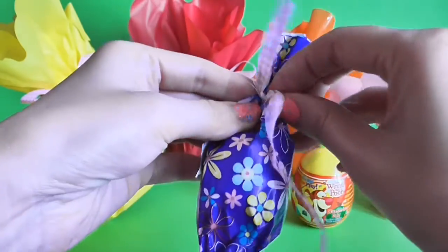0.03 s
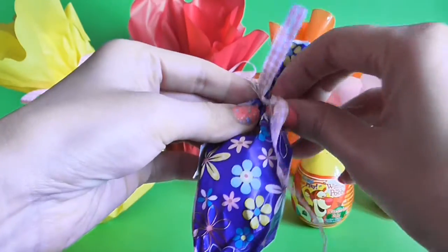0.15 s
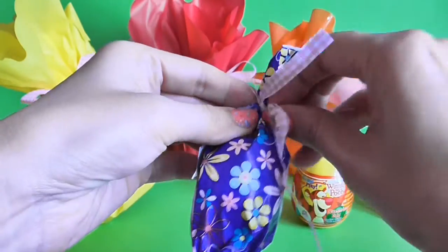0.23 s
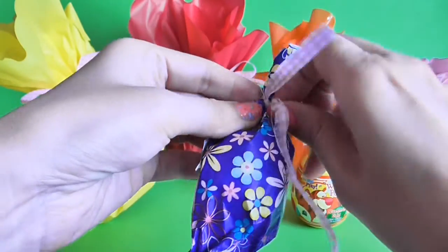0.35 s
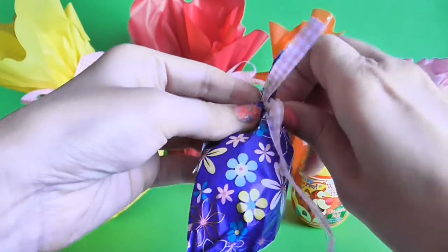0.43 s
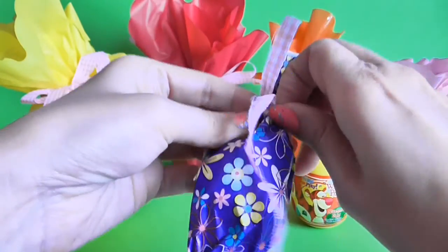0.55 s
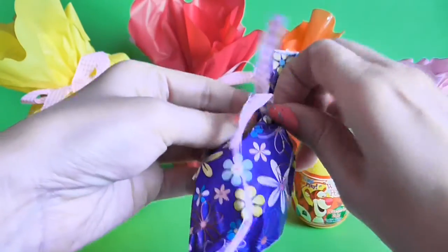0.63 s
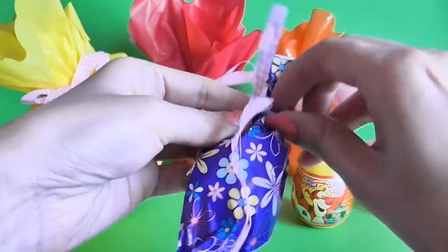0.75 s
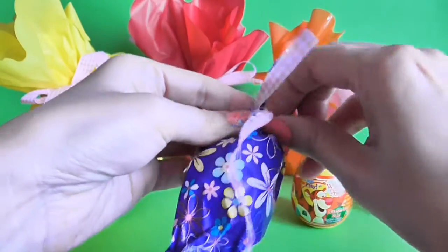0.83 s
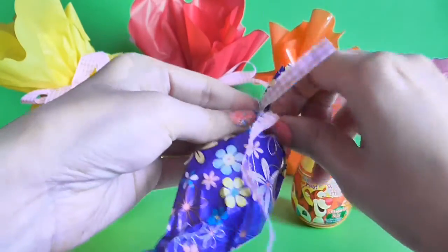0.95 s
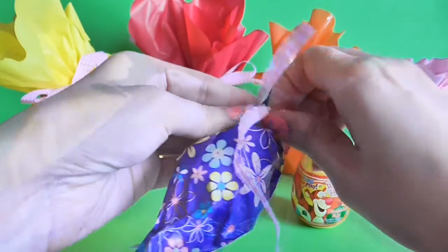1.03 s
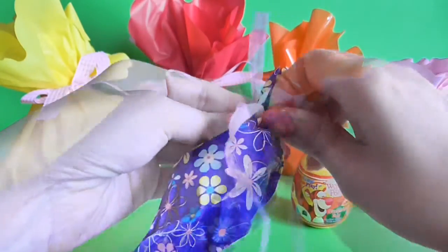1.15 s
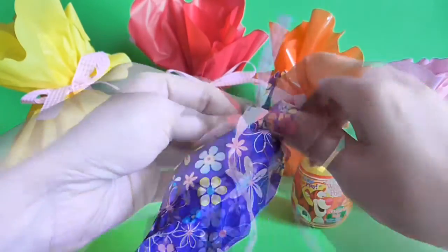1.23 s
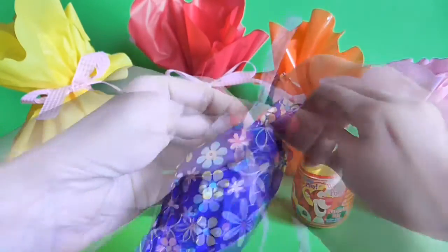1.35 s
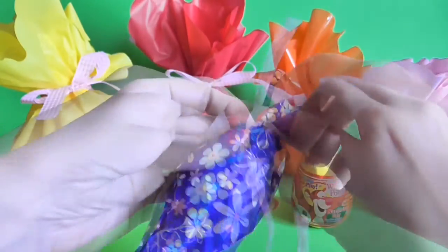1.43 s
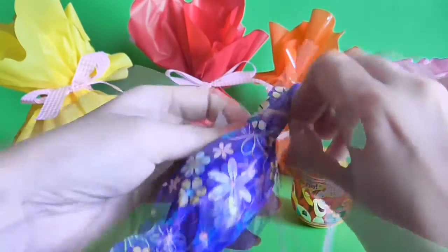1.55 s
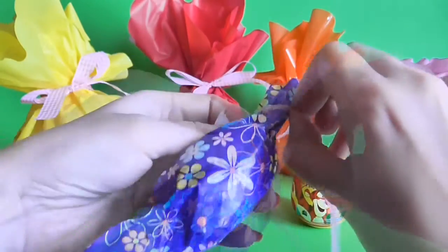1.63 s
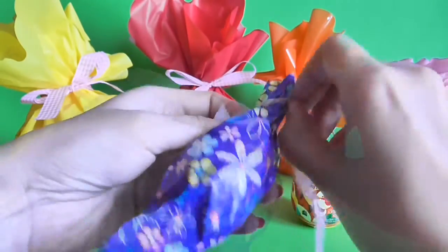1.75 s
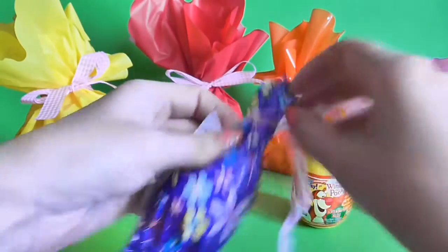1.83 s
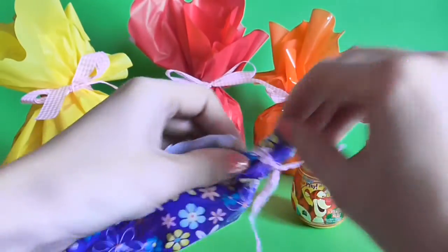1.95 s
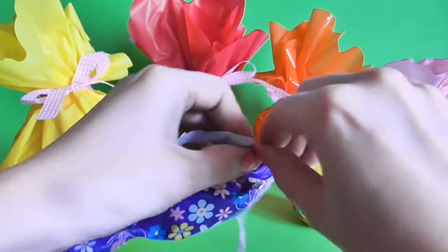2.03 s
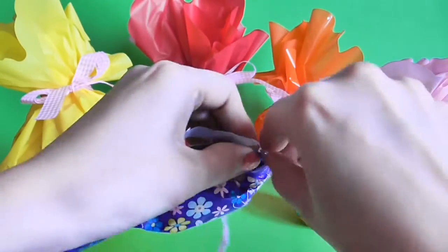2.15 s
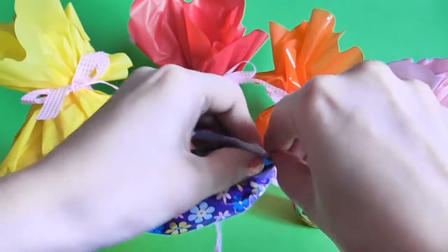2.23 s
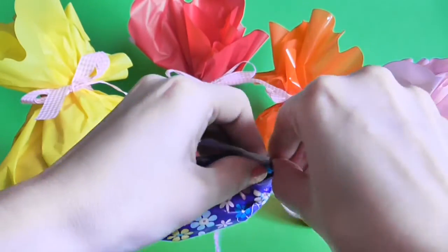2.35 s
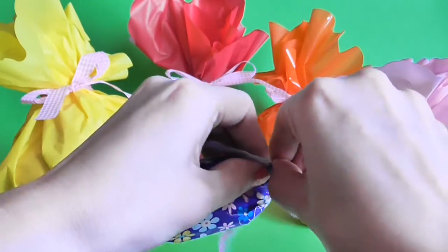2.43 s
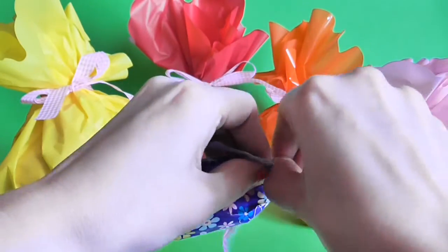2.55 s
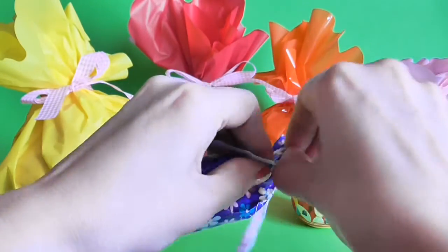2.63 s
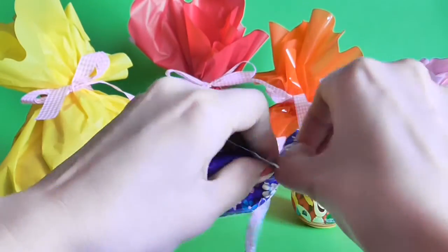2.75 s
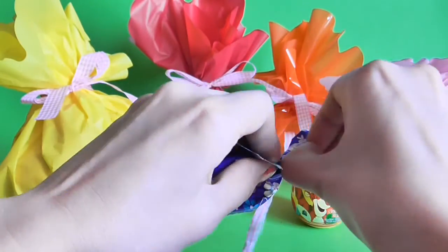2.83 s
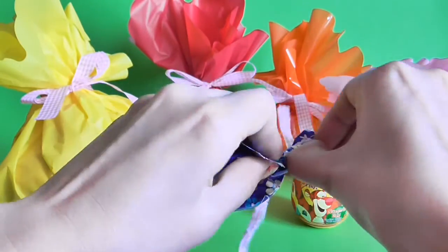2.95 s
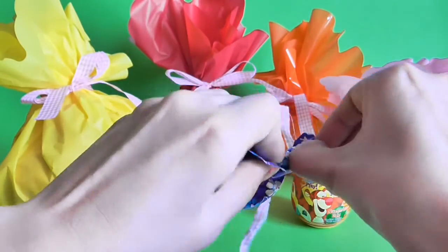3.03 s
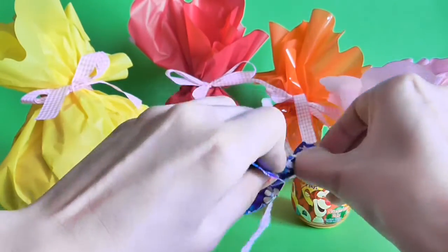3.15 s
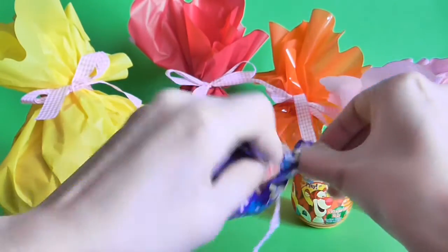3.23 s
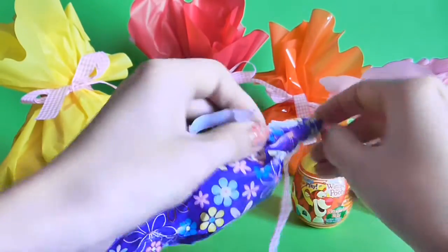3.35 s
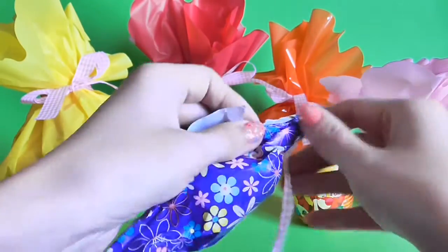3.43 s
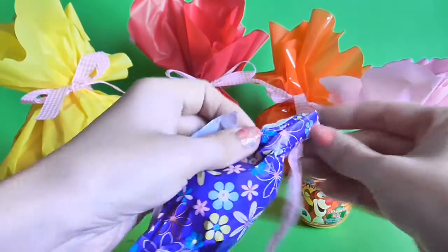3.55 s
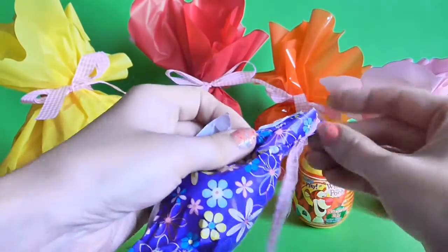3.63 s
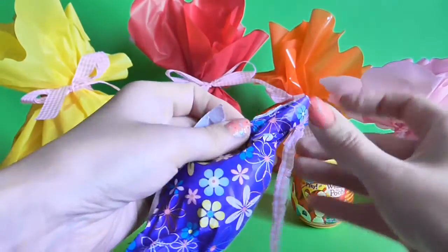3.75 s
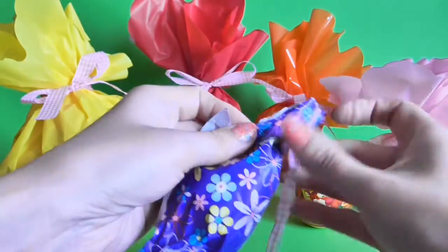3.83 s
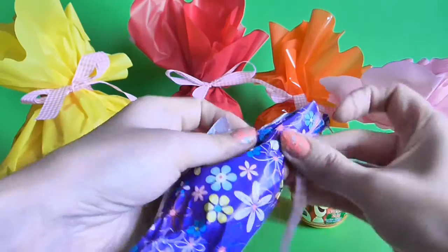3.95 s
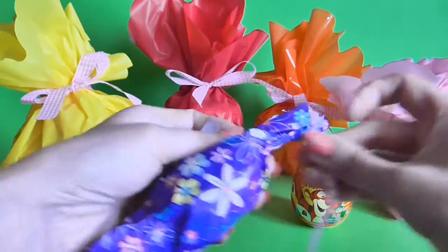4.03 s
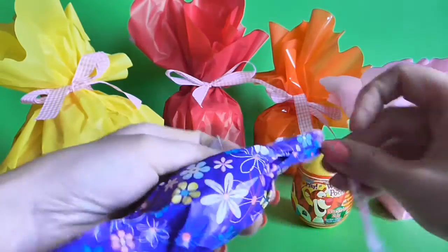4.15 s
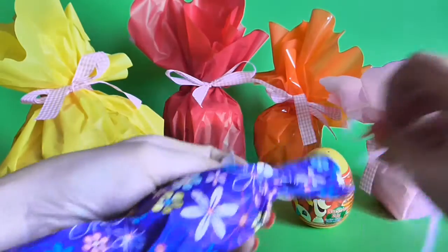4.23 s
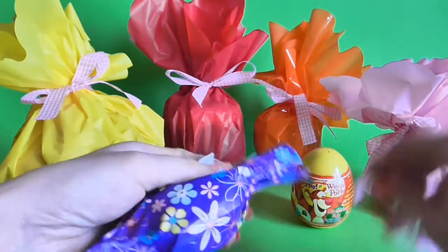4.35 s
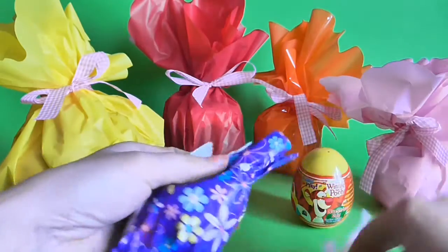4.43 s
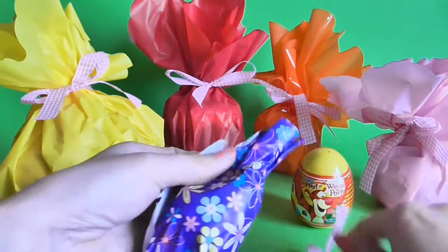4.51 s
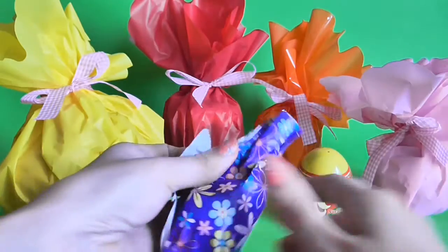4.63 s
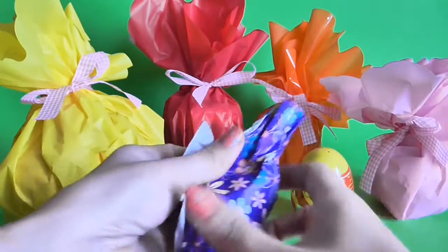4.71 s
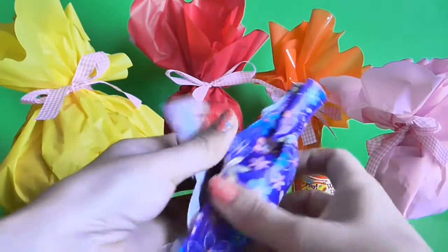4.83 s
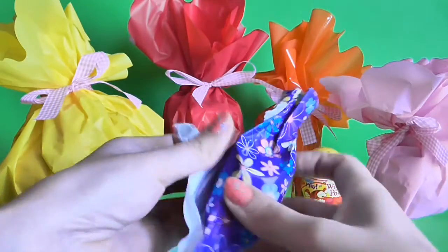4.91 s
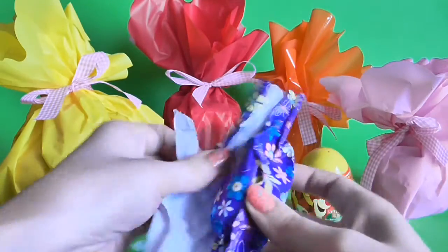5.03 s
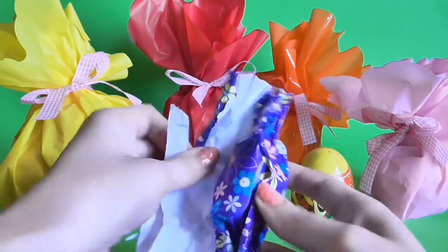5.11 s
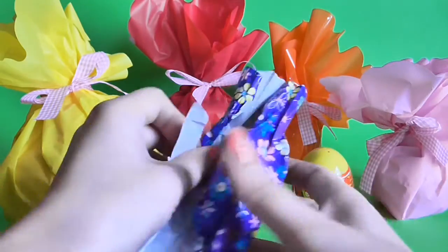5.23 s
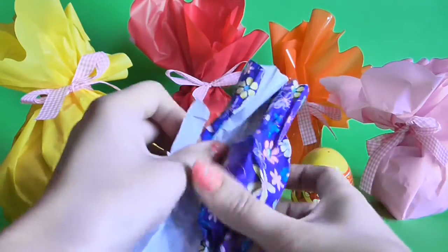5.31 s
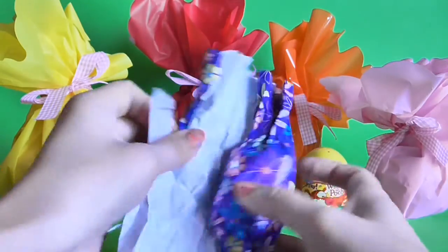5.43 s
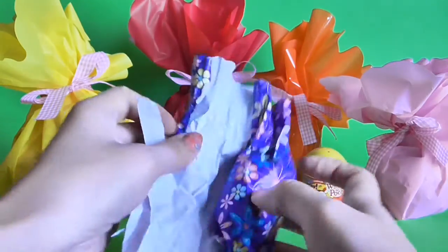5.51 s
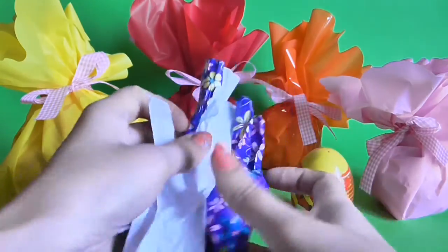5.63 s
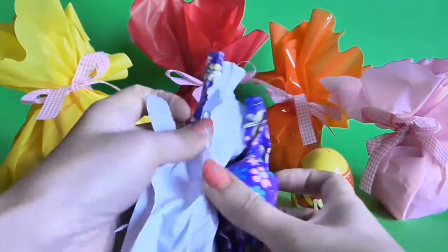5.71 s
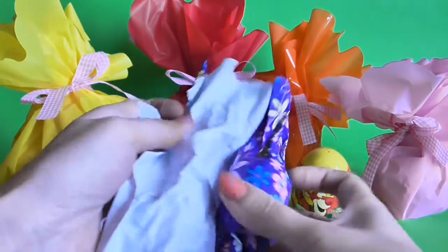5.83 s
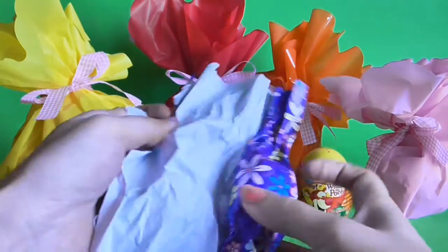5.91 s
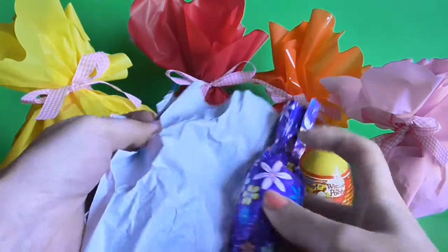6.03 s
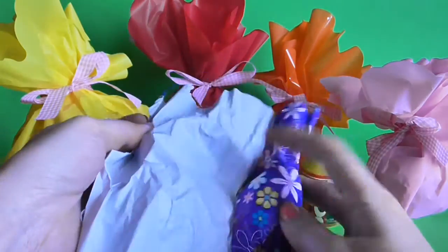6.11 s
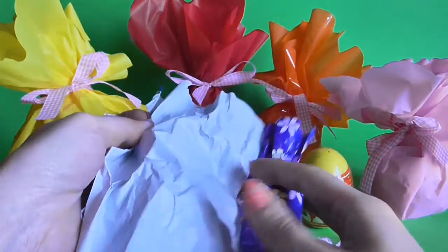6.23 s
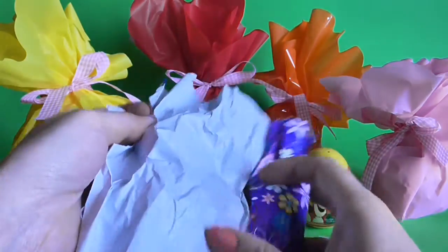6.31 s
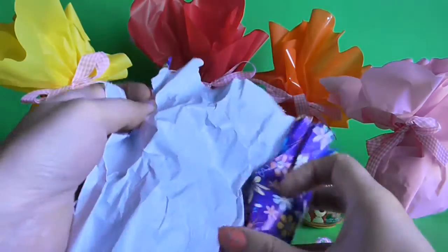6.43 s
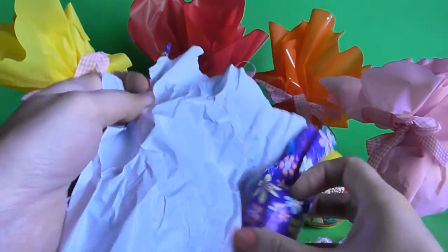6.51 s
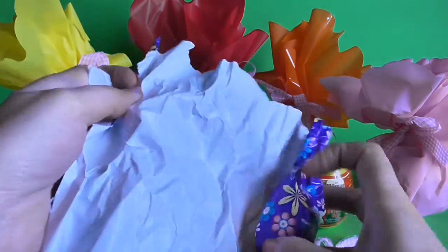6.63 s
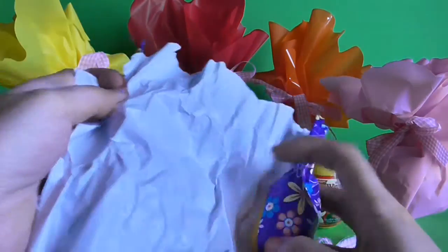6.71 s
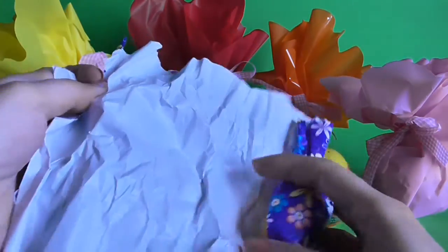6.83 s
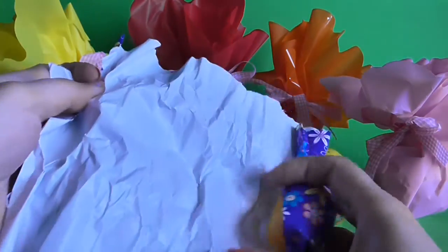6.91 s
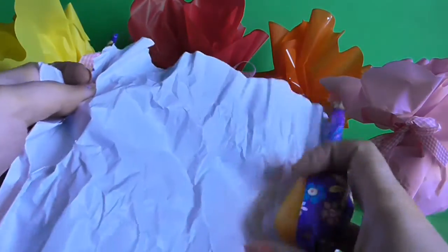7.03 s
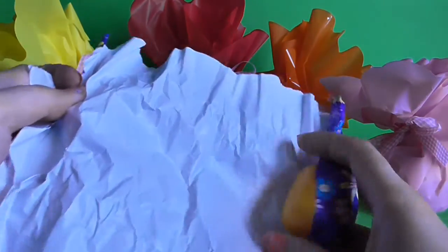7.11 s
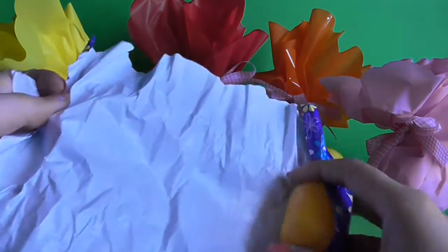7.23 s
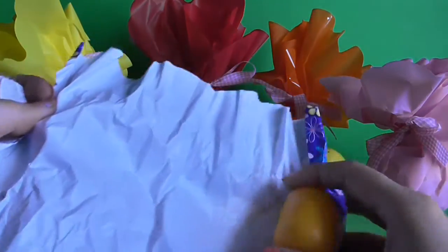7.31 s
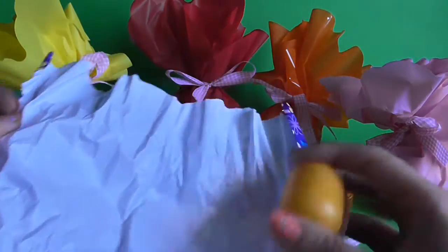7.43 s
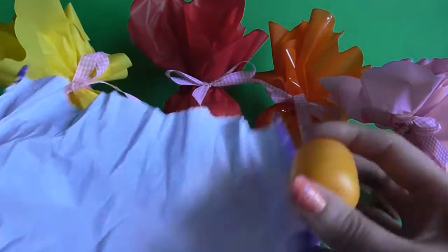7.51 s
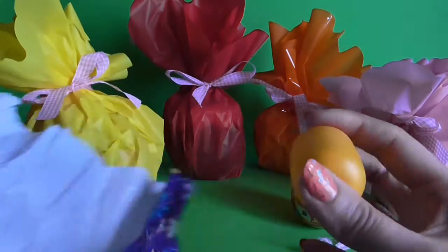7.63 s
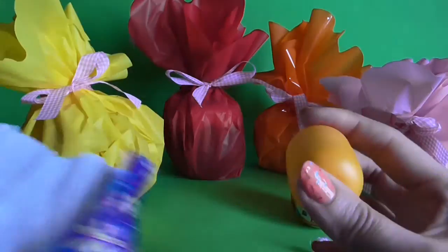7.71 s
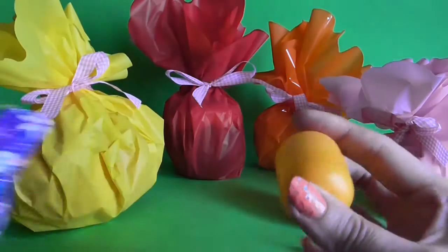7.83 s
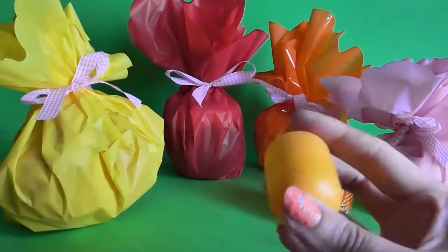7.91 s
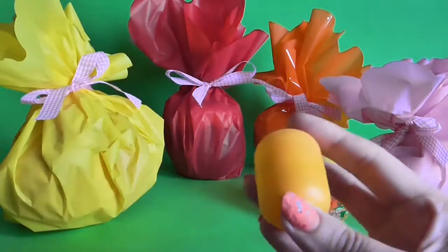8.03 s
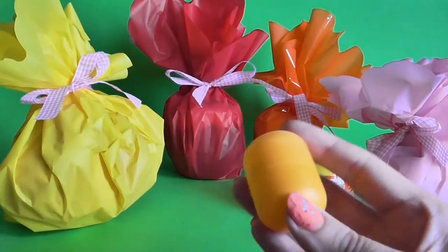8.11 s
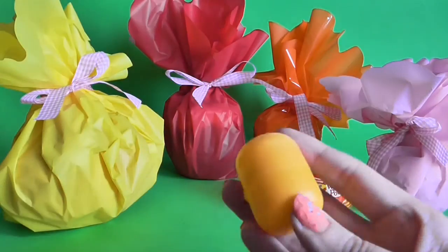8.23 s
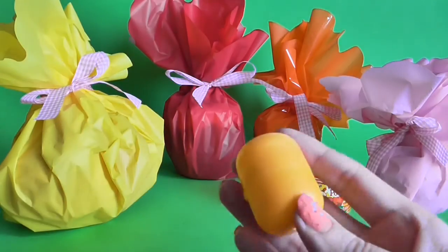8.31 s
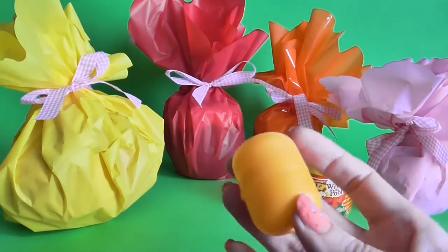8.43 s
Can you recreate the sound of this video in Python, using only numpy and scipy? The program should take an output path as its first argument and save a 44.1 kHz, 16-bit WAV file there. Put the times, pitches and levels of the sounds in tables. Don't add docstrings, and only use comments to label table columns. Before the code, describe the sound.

Hands work at a ribbon on stiff paper very close to a stereo microphone in a soft, quiet room. Sparse sharp ticks and short crinkles come first, then a thin, high ribbon rub. After a strong snap the paper opens in dense crackling and broad rustling, with dull puffs as the sheet flaps, then thins to a few faint rustles.

```python
import sys
import numpy as np
from scipy import signal
from scipy.fft import rfft, irfft, next_fast_len
from scipy.io import wavfile
from scipy.ndimage import uniform_filter1d

SR = 44100
rng = np.random.default_rng(int(sys.argv[2]) if len(sys.argv) > 2 else 0)


def gain_from_db(level_db):
    decades = np.asarray(level_db, float) / 20
    return 10 ** decades


def dump_mix(stems):
    frames = np.atleast_2d(stems).T
    limited = np.clip(frames, -1, 1)
    pcm = np.round(limited * 32767).astype(np.int16)
    wavfile.write(sys.argv[1], SR, pcm)


N = 373508


def rms_one(x):
    return x / np.sqrt(np.mean(x ** 2) + 1e-20)


def at_hz(points, hz):
    point_hz, point_db = np.transpose(points)
    return np.interp(np.log(hz), np.log(point_hz), point_db)


def drift(rate):
    r = np.exp(-16 * np.pi * rate / SR)
    noise = rng.standard_normal(N // 8 + 4002)
    slow = signal.lfilter([1], [1, -2 * r, r * r], noise)[4000:]
    return np.interp(np.arange(N) / 8, np.arange(len(slow)), rms_one(slow))


def band(x, low_hz, high_hz):
    edges = [low_hz, min(high_hz, SR / 2.1)]
    return signal.sosfilt(signal.butter(2, edges, "band", fs=SR, output="sos"), x)


def coloured(x, spectrum):
    hz = np.maximum(np.fft.rfftfreq(N, 1 / SR), 10)
    return irfft(rfft(x) * gain_from_db(at_hz(spectrum, hz)), N)


def capsules(x, lean):
    short_waves = band(band(x, 8740, 14300), 5600, 14600)
    side = lean * (short_waves * 0.91 + 0.26 * x)
    return np.array([x + side, x - side])


def low_swings(events, gain_db, swing_hz, t60_s, low_hz, high_hz):
    kicks = np.zeros(N)
    for s, db in events:
        kicks[round(s * SR)] = gain_from_db(db + gain_db)
    r = gain_from_db(-60 / (t60_s * SR))
    w = 2 * np.pi * swing_hz / SR
    swing = signal.lfilter([0, np.sin(w)], [1, -2 * r * np.cos(w), r * r], kicks + 1e-18)
    return band(swing, low_hz, high_hz)


# frequency in Hz, level in dB per Hz.
AIR = [(35, -15.5), (60, -14.5), (91, -8.5), (515, -5), (1660, -20), (14200, -31), (16000, -30)]


def hush(level_db=-64):
    mid, side = rms_one(coloured(rng.standard_normal((2, N)), AIR))
    return gain_from_db(level_db) * (mid + 1.9 * side * np.array([[1], [-1]]))


def room(x, t60_s=0.15, wall_cut_hz=15000):
    size = next_fast_len(N + SR // 2)
    w = 2 * np.pi * np.fft.rfftfreq(size)
    dull = 1 / (1 + 1j * w * SR / (2 * np.pi * wall_cut_hz))
    response = np.zeros((2, len(w)), complex)
    lags = (rng.uniform(0.0036, 0.014, 12) * SR).astype(int)
    for k, lag in enumerate(lags):
        loop = gain_from_db(-60 * lag / SR / t60_s) * dull * np.exp(-1j * w * lag)
        response[k % 2] += loop / (1 - loop) * (-1) ** (k // 2)
    return irfft(response * rfft(x, size), size)[:, :N]


# start in seconds, level in dB.
THUDS = [
    (0.111, -58),
    (0.4, -55),
    (0.869, -62),
    (1.819, -49),
    (1.889, -59),
    (1.949, -57),
    (4.149, -55),
    (5.819, -51),
    (6.199, -57),
    (7.591, -50),
]


def thuds():
    return low_swings(THUDS, gain_db=-0.5, swing_hz=84, t60_s=0.065, low_hz=42, high_hz=260)


# start in seconds, level in dB.
POPS = [(3.4551, -34), (4.297, -28.5), (4.9062, -27.5), (5.549, -26.5), (6.141, -36), (5.892, -24),
        (5.989, -22.5), (6.077, -25), (1.506, -38), (6.4601, -34), (6.636, -23.5), (6.671, -17),
        (7.0518, -32.5), (7.702, -32)]


def pushes():
    return low_swings(POPS, gain_db=-7.5, swing_hz=142, t60_s=0.024, low_hz=61, high_hz=900)


# time in seconds, flapping against folding in dB.
SLACK = [(0, -15.5), (1.4, -17.5), (1.85, -12.5), (2.3, -14), (2.7, -8), (3.0, -22.5), (3.7, -22.5),
         (4.5, -8.5), (5.2, -13), (5.9, -9.5), (6.6, -8), (7.4, -14), (8.47, -8)]


def slack(s):
    return np.interp(s, *np.transpose(SLACK))


# moment of most effort in seconds, rise over 20 dB in seconds, fall over 20 dB in
# seconds, crackle level in dB, folding level in dB.
MOVEMENTS = [(.13, 0.14, 0.08, -41, -46.5), (.43, 1.2, 0.26, -48, -51), (0.776, 0.03, 0, -32, -41),
             (0.889, 0.15, 0.11, -41, -47.5), (1.09, 2.5, 1, -52, -58), (1.253, -0.26, 0.02, -40, -40.5),
             (1.516, 0.03, -0.01, -27, -34), (1.73, 0.9, 0.4, -45.5, -51.5), (1.972, 0.06, 0, -32, -37),
             (2.129, 0.2, 0.24, -44, -48.5), (2.34, 0.06, -0.33, -42.5, -49), (2.45, .02, 0.9, -49.5, -53),
             (2.716, 0.01, 0.05, -29.5, -36.5), (2.872, 0.1, 0.23, -38.5, -42.5),
             (3.012, -0.5, 0.07, -38.5, -43.5), (3.146, 0.2, 0, -44.5, -50.5), (2.4, 2.5, .1, -54, -61.5),
             (2.56, -0.1, 0, -42, -52), (3.244, 0.26, 0.03, -41.5, -46), (3.457, 0.18, 0.47, -43.5, -46.5),
             (3.532, 0.16, 0.14, -48.5, -48), (3.666, 0.04, 0.08, -35.5, -42), (3.996, -0.16, 17, -52.5, -54.5),
             (4.138, 0.01, 0.1, -31.5, -38), (4.2, 0.02, 0.07, -34, -43), (4.302, 0.01, -0.13, -21, -32),
             (4.492, 0.17, 0.15, -42, -49),
             (4.587, 0.081, 0.095, -38.5, -43), (4.761, 0.1, 0.053, -41, -43.5),
          (4.91, 0.061, 0.43, -35.5, -49), (5.1, 0.15, 0.28, -32.5, -35.5), (5.279, 1, 0.072, -36, -38),
          (5.499, 0.057, 0.18, -33.5, -32.5), (5.712, 0.089, 0.071, -36.5, -36),
          (5.912, 0.19, 0.4, -29.5, -29), (6.08, 0.17, 0.033, -34, -33), (6.19, 0.091, 0.5, -40.5, -43.5),
          (6.398, 0.11, 0.73, -37.5, -39.5), (6.657, 0.1, 0.11, -28.5, -30),
          (6.85, 0.065, 0.58, -39.5, -43), (7.1, 0.3, 0.45, -35.5, -36.5), (7.26, 0.074, 0.083, -30, -32.5),
          (7.47, 1, 0.36, -47, -48.5), (7.58, 0.17, 0.13, -51, -41), (7.655, 0.059, 0.017, -25, -38),
          (7.732, 0.0083, .17, -44.5, -42.5), (7.88, 0.13, 0.083, -55, -47), (8.02, 0.3, 0.29, -55, -53),
          (8.159, .06, 0.13, -39.5, -36.5),
             (2.672, .01, .15, -43, -51),
    (7.605, .01, 0.12, -36.5, -37.5),
    (7.79, .03, 0.069, -44.5, -50),
    (8.24, .2, .2, -45.5, -47),
    (4.32, .02, 0.13, -39, -45.5),
    (5.421, .04, 0.04, -49, -37.5),
    (8.33, 0.12, 0.034, -40.5, -42),
    (8.46, 0.52, 0.088, -54.5, -51.5),
]


def effort(reach_s=0.56, flap_follows=0.94, mean_fold_db=-6):
    t = np.arange(0, N + 64, 64) / SR
    s, rise, fall, crackle_db, fold_db = np.transpose(MOVEMENTS)[:, :, None]
    away = 20 * np.maximum((s - t) / np.maximum(rise, .01), (t - s) / np.maximum(fall, .01))
    away = away + 20 * ((t - s) / reach_s) ** 4
    crackle = np.max(crackle_db - away, axis=0)
    fold = np.max(fold_db - away, axis=0)
    flap = mean_fold_db + flap_follows * (fold - mean_fold_db) + slack(t)
    return [np.interp(np.arange(N) / SR, t, db) for db in (flap, fold, crackle)]


# centre in Hz, width in Hz, level against the crackle in dB.
WEAVE = [
    (6120, 800, -9),
    (8170, 1100, -9),
]


def ribbon(from_s=2.21, to_s=3.35, fade_s=0.098):
    t = np.arange(N) / SR
    sliding = np.clip(np.minimum(t - from_s, to_s - t) / fade_s, 0, 1)
    song = np.zeros(N)
    for hz, width, db in WEAVE:
        threads = rms_one(band(rng.standard_normal(N), hz - width / 2, hz + width / 2))
        song += gain_from_db(db + 4.6 * drift(9.7)) * threads
    crackle_db = effort()[2]
    return capsules(song * sliding * gain_from_db(crackle_db), -.05)


# frequency in Hz, level in dB per Hz.
PAPER = [(35, -43), (60, -27.5), (256, -7), (363, 0.5), (1780, 0), (2710, -17.5), (4420, -7), (8320, -10),
         (14600, -31), (16000, -1)]


def rustle(per_s, spread_db, clump_db, rub_db, count=24):
    levels = [gain_from_db(db) for db in effort()]
    swarm = gain_from_db(clump_db * drift(60))
    sizes = gain_from_db(spread_db * np.minimum(rng.exponential(1, N), 2.6)) * rng.choice([-1, 1], N)
    clicks = sizes * (rng.random(N) < per_s * swarm / SR) + 1e-18
    pitch = rng.uniform(np.log(150), np.log(13000), N)
    touch = np.clip(levels[2] / gain_from_db(-41.5), .2, 5) ** -0.27
    rubbing = gain_from_db(rub_db) * touch * swarm * rng.standard_normal((2, N))
    zones = np.zeros((3, N))
    for k, hz in enumerate(np.geomspace(85, 15000, count)):
        if k % 2 == 0:
            patch = gain_from_db(3.74 * drift(7.5))
        struck = clicks * np.exp(-((pitch - np.log(hz)) / .45) ** 2)
        source = rms_one(struck) + rubbing[k % 2]
        zone = int(hz > 320) + int(hz > 3000)
        zones[zone] += patch * gain_from_db(at_hz(PAPER, hz)) * band(source, hz / 1.125, hz * 1.188)
    mix = np.zeros(N)
    for gain_db, zone, level in zip([-3, -2, -2], zones, levels):
        power = uniform_filter1d(uniform_filter1d(zone ** 2, size=1800), size=1800)
        mix += gain_from_db(gain_db) * zone * level / np.sqrt(power)
    return capsules(mix, -.06 + 0.44 * drift(13))


def table(x, bounce_ms=0.492, wander_ms=0.036, share=0.2):
    lag = (bounce_ms + wander_ms * drift(1.53)) * SR / 1000
    at = np.arange(N)
    bounce = [np.interp(at - lag, at, side) for side in band(x, 3200, 11600)]
    return x + share * np.array(bounce)


# start in seconds, crease level in dB,
# crease pitch in Hz, fold level in dB, fold pitch in Hz.
CREASES = [(0.0244, -26.5, 6360, -60, 1800), (0.0518, -6, 7500, -24.5, 1880),
           (0.119, -14.5, 3530, -18.5, 1750), (0.19, -19.5, 8800, -46, 2290),
           (0.336, -12.5, 3900, -36.5, 1840), (0.4134, -6.5, 7700, -28, 1950),
           (0.4838, -19, 9500, -26, 1360), (0.6343, -29, 4740, -47, 1170), (0.733, -38, 5530, -36.5, 950),
           (0.7791, -16, 9700, -20.5, 2040), (0.861, -25.5, 9870, -35, 715),
           (0.8842, -27.5, 4830, -38, 1950), (0.9635, -18.5, 4370, -31.5, 1640),
           (1.0517, -22.5, 8500, -40.5, 2320), (1.229, -39, 4800, -29.5, 2070),
           (1.2424, -24, 4100, -31, 1920), (1.3405, -19, 4840, -31, 2460), (1.5074, -14, 4230, -19.5, 1335),
           (1.5604, -14, 3860, -21, 1970), (1.5971, -16, 4560, -26.5, 2470),
           (1.6928, -13, 4420, -27.5, 2040), (1.7255, -13, 9000, -25.5, 1960),
           (1.7385, -16, 4450, -48, 2380),
           (1.8407, -25.5, 8110, -46, 1190), (2.1703, -35, 5000, -32.5, 1880),
           (2.2744, -22.5, 5540, -29.5, 2260), (2.859, -7, 4120, -29, 1590), (2.876, -10.5, 6240, -36, 940),
           (2.906, -8.5, 6460, -30.5, 2700), (2.995, -13, 6200, -40.5, 780), (3.4535, -15, 5240, -19, 790),
           (3.5252, -19, 8620, -29, 820), (3.5393, -30, 4120, -31, 2270), (3.6656, -17, 5160, -34, 1190),
           (3.6737, -12, 5060, -29.5, 2400), (3.9748, -29.5, 6060, -31.5, 840),
           (4.1487, -16, 3500, -25, 644), (4.2832, -8.5, 5940, -21, 2280), (4.2957, -2, 6140, -26, 715),
           (4.7618, -14, 4640, -33, 585), (4.769, -23, 4870, -26.5, 1250),
           (4.9052, -6.5, 5200, -16, 1980), (4.9556, -15.5, 4400, -23.5, 2330),
           (4.9856, -11.5, 3580, -27.5, 1270), (5.037, -15, 4200, -25.5, 1550),
           (5.0624, -10.5, 3950, -20, 1260), (5.0715, -7, 4540, -27, 646), (5.0991, -16, 4700, -28, 1260),
           (5.126, -11.5, 4510, -23.5, 2500), (5.1406, -19, 5640, -23.5, 1270),
           (5.162, -8.5, 4900, -18, 1350), (5.2403, -13, 2980, -21, 1160), (5.2491, -35, 3880, -23, 1170),
           (5.4216, -20.5, 7600, -26, 1110), (5.4823, -14, 4100, -24.5, 1610),
           (5.5055, -5.5, 5400, -13.5, 1870), (5.525, -13, 4260, -25, 1340),
           (5.558, -9.5, 4230, -25.5, 1210), (5.6007, -16.5, 4560, -27, 1290),
           (5.722, -18.5, 7760, -31, 1780),
           (5.818, -10.5, 4470, -21, 760), (5.893, -17.5, 4060, -22, 1580), (5.91, -19, 5640, -19, 1450),
             (5.9461, -12, 4760, -18, 1030), (5.963, -12, 3780, -24, 1780),
             (5.9747, -13, 6900, -30.5, 1350), (6.006, -11, 7550, -40, 1970), (6.0682, -8, 5440, -37, 1470),
             (6.1134, -18.5, 4330, -32, 1880), (6.176, -38, 4130, -24.5, 1020),
             (6.186, -14.5, 4700, -34, 733), (6.2438, -7.5, 5100, -34, 830),
             (6.295, -23.5, 5000, -28.5, 800), (6.405, -20, 4300, -40, 1330), (6.462, -24, 4100, -27, 1170),
             (6.4722, -9, 6150, -29, 1200), (6.541, -10, 7440, -23.5, 1910),
             (6.551, -4.5, 8600, -27.5, 1120), (6.6364, -15, 7200, -29, 790),
             (6.67, -9.5, 4830, -13.5, 1150), (6.7066, -43, 4510, -22.5, 1340),
           (6.8338, -13, 4180, -22, 1760), (6.8424, -26, 7750, -37, 800), (6.9017, -5, 6940, -23.5, 1650),
            (6.909, -5.5, 8000, -23, 1710), (6.9573, -16, 3370, -30, 1230), (7.0357, -24, 3610, -25, 1620),
            (7.0516, -34, 4530, -25.5, 630), (7.0848, -19, 3500, -29.5, 770),
            (7.2417, -25, 7550, -21.5, 880), (7.278, -11, 6240, -29.5, 624),
            (7.3738, -25.5, 3420, -29.5, 1790), (7.4, -24, 3040, -28.5, 1200),
            (7.5991, -18.5, 5030, -19, 1800), (7.6652, -7.5, 8700, -30.5, 1050),
            (7.7009, -17, 7180, -29.5, 1320), (7.7351, -16.5, 4100, -16.5, 1950),
            (8.123, -30, 5100, -33, 665), (8.14, -14.5, 6530, -28.5, 1140), (8.147, -17.5, 4530, -26, 2010),
            (8.165, -21, 6300, -30, 1030),
           (0.047, -31, 5000, -35, 2100),
    (4.272, -28, 6000, -34, 2200),
    (4.134, -22.5, 4100, -29, 1500),
    (7.3056, -38, 4500, -38, 1460),
    (1.712, -31, 4400, -33, 1940),
    (2.1784, -32.5, 5050, -30.5, 1950),
    (7.977, -50, 2900, -39.5, 980),
    (8.3858, -50, 6000, -36, 1660),
]
# start in seconds, level in dB, pitch in Hz.
KINKS = [(0.2353, -45, 1940), (0.394, -47, 680), (0.4469, -51, 1940), (0.6055, -44, 1900),
         (0.9722, -40, 1620), (1.1254, -45, 1770), (1.1537, -43, 1950), (1.2, -39, 2020),
         (1.3802, -44.5, 1930), (1.3938, -44.5, 1890), (1.624, -42, 600), (1.6495, -43, 820),
         (1.9543, -42, 1340), (1.9711, -39, 694), (2.0168, -49, 780), (2.0972, -42, 795),
         (2.137, -37, 1230), (2.7346, -40, 1250), (2.8184, -39.5, 1980), (2.832, -46, 620),
         (2.9207, -35.5, 2690), (3.0823, -42, 760), (3.1276, -53, 2480), (3.1466, -44, 670),
         (3.2297, -38, 815), (3.3836, -44, 1570), (4.1246, -37, 800), (4.1679, -38, 780),
         (4.4855, -41, 1380), (4.5192, -39, 1200), (4.8963, -29.5, 1270), (4.9745, -36, 1960),
         (5.0086, -31, 1210), (5.2222, -28, 1060), (5.2706, -33, 1340), (5.3297, -34, 1830),
         (5.4909, -27, 1680), (5.5501, -28, 670), (5.5742, -29.5, 1250), (5.63, -41, 605),
         (5.6672, -36.5, 900), (5.7175, -25, 1850), (5.7824, -40, 1790), (5.8445, -28, 1740),
         (5.8517, -30, 870), (6.0056, -31, 1890), (6.0679, -29.5, 1230), (6.0814, -34, 1590),
         (6.1038, -32, 1110), (6.1968, -34.5, 1270), (6.3419, -32, 1720), (6.3829, -38, 790),
         (6.4185, -41, 690), (6.5313, -33, 1170), (6.8422, -29, 1640), (6.8741, -30, 855),
         (7.0844, -25.5, 1890), (7.5344, -35.5, 776), (8.054, -47, 600), (8.3328, -38, 950)]
# start in seconds, level in dB, pitch in Hz.
NICKS = [(0.1302, -27, 3570), (0.4469, -29, 7520), (0.6049, -41, 4720), (0.974, -24, 4250),
         (1.0327, -38, 7580), (1.079, -37, 4700), (1.0956, -38, 8660), (1.1537, -34, 7100),
         (1.2, -36, 4480), (1.2286, -33, 4800), (1.2334, -33, 3980), (1.2504, -24, 5240),
         (1.3232, -44, 7920), (1.3939, -38.5, 4330), (1.5492, -17, 4870), (1.5759, -21, 7170),
         (1.6493, -25, 4390), (1.713, -23, 4030), (2.0962, -26, 6030), (2.344, -26, 7820),
         (2.4898, -25, 8500), (2.5313, -28, 6290), (2.58, -30, 6310), (2.6664, -32, 6370),
         (2.8714, -15, 6160), (3.0813, -31, 4400), (3.128, -34, 5960), (3.1719, -29, 7970),
         (3.2303, -32, 7520), (3.5323, -22, 8550), (3.7268, -41, 5210), (3.7576, -42.5, 4890),
         (3.9268, -49, 6930), (3.9976, -29, 6160), (4.2019, -22, 6740), (4.5522, -32, 4350),
         (4.6116, -28, 8290), (4.8967, -29, 4090), (5.1132, -18, 5920), (5.1906, -15, 4200),
         (5.3912, -25.5, 8250), (5.427, -26, 4500), (5.4702, -20, 6930), (5.5198, -8, 10600),
         (5.5745, -22, 4110), (5.6864, -23, 4630), (5.912, -25, 5710), (6.342, -33, 3620),
         (6.4185, -34, 4650), (6.8435, -23, 3920), (7.2432, -14, 5700), (7.5643, -34, 4840),
         (8.0274, -40, 5450), (8.1065, -42, 4840), (8.3314, -27, 5800)]


def buckles():
    silent_db = -120
    kinks = [(s, silent_db, 5000, db, hz) for s, db, hz in KINKS]
    nicks = [(s, db, hz, silent_db, 1000) for s, db, hz in NICKS]
    events = CREASES + kinks + nicks
    s, crease_db, crease_hz, fold_db, fold_hz = np.transpose(events)
    smaller_oct = np.log2(np.maximum(fold_hz / 1000, 1))
    flap_db = fold_db + 1.5 + slack(s) - 15 * smaller_oct + rng.normal(0, 4.5, len(s))
    creases = np.transpose([s, flap_db, fold_hz, fold_db + 3.5, crease_hz, crease_db - 1.47])
    pops = [(s, db, 1000, silent_db, 5000, silent_db) for s, db in POPS]
    return np.vstack([creases, pops])


# lowest Hz, highest Hz, ring in cycles, flutter level in dB,
# flutter t60 in seconds.
ZONES = [
    (118, 1040, 3.2, -15, 0.054),
    (610, 3170, 7.7, -12, 0.035),
    (3590, 12900, 8.8, -10.5, 0.02),
]


def snaps(count=5, size=1800):
    rows, t = buckles(), np.arange(size) / SR
    shapes = np.zeros((len(rows), size))
    leading = [rng.uniform(194, 474, len(rows)), rows[:, 2], rows[:, 4]]
    zone_levels = rows[:, 1::2].T
    for (low_hz, high_hz, cycles, flutter_db, t60), lead, level_db in zip(ZONES, leading, zone_levels):
        pitch, delay, length, sign = np.moveaxis(rng.random((len(rows), count, 4, 1)), 2, 0)
        hz = np.clip(lead[:, None, None] * 2 ** (2.35 * (pitch - .45)), low_hz, high_hz)
        hz[:, 0, 0] = lead
        length[:, 0] = 1
        late = np.maximum(t - 0.000409 * delay, 0)
        decay = gain_from_db(-60 * late * hz / (cycles * (0.79 + 0.91 * length)))
        strength = np.sign(sign - .5) * gain_from_db(-7 * (np.arange(count) > 0))[:, None]
        modes = np.sum(strength * np.sin(2 * np.pi * hz * late) * decay, axis=1)
        modes = band(modes, low_hz / 0.9, high_hz * 1.02)
        modes = modes / np.abs(modes).max(axis=1, keepdims=True)
        flutter = rms_one(band(rng.standard_normal((len(rows), size)), low_hz, high_hz / 1.395))
        flutter = flutter * gain_from_db(flutter_db - 60 * t / t60) * (1 - np.exp(-t / 0.00075))
        shapes += (modes + flutter) * gain_from_db(level_db)[:, None]
    pair = capsules(shapes, -.1 + 0.51 * rng.standard_normal((len(rows), 1)))
    out = np.zeros((2, N + size))
    for k, s in enumerate(rows[:, 0]):
        at = round((s - .0003) * SR)
        out[:, at:at + size] += pair[:, k]
    return out[:, :N]


def scene():
    rustling = table(rustle(per_s=1100, spread_db=6.5, clump_db=2.5, rub_db=-1.5))
    paper = snaps() + pushes() + thuds() + rustling + ribbon()
    echo = room(paper.mean(axis=0))
    shared = echo.mean(axis=0)
    difference = echo - shared
    apart = 0.33 * difference + 0.36 * band(difference, 48, 1160)
    return paper + gain_from_db(-19.5) * (shared + apart) + hush()


def roll_off(x):
    return signal.sosfilt(signal.butter(12, 16990, fs=SR, output="sos"), x)


def record(dry):
    bass = signal.lfilter(*signal.butter(1, 550, fs=SR), dry)
    housing = 0.24 * band(dry, 1560, 2680)
    mix = dry + bass * np.array([[-.22], [.22]]) + housing
    mix = signal.sosfilt(signal.cheby2(10, 60, 17200, fs=SR, output="sos"), mix)
    return roll_off(mix)


dry = scene()
out = record(dry)
dump_mix(out)
```